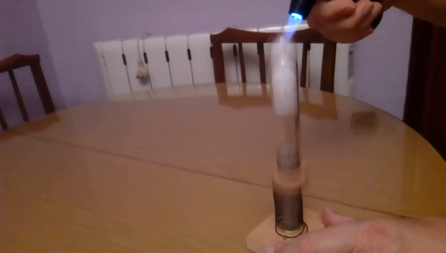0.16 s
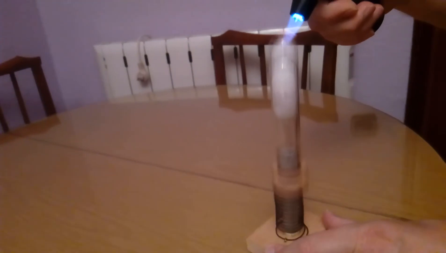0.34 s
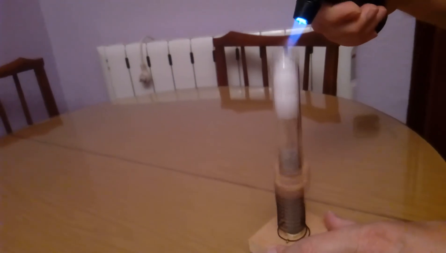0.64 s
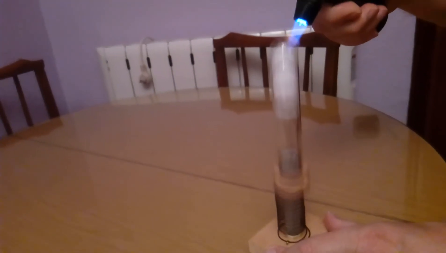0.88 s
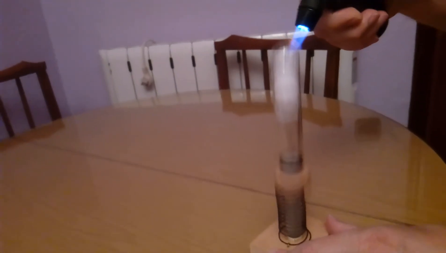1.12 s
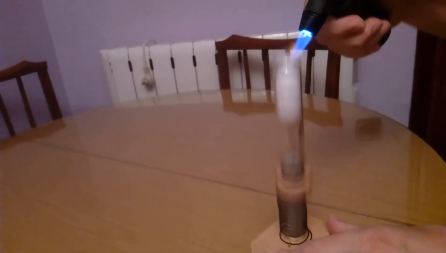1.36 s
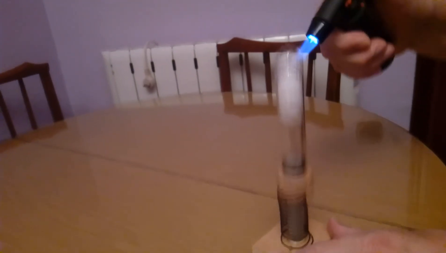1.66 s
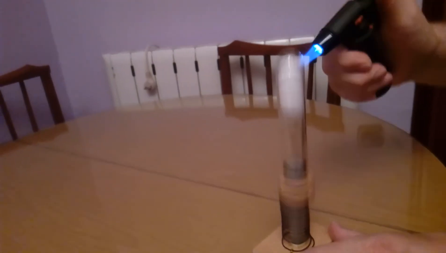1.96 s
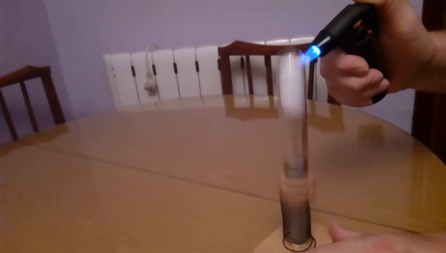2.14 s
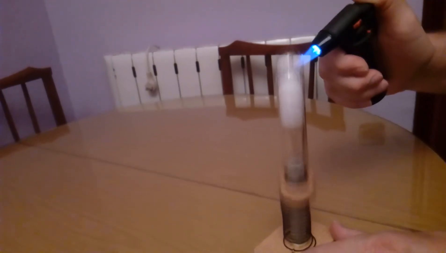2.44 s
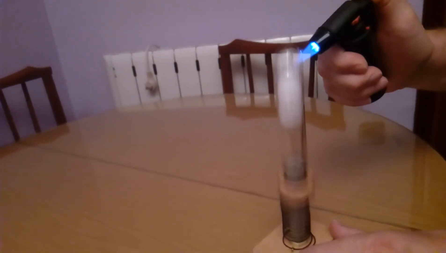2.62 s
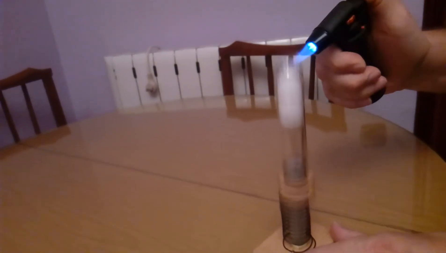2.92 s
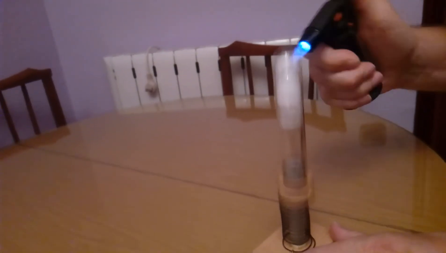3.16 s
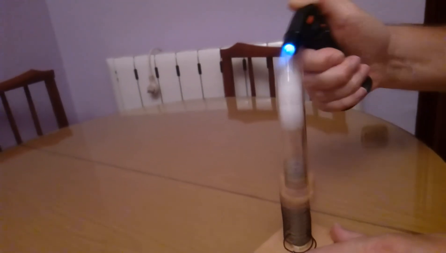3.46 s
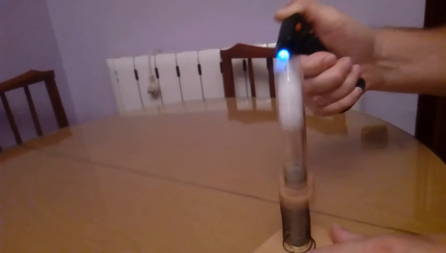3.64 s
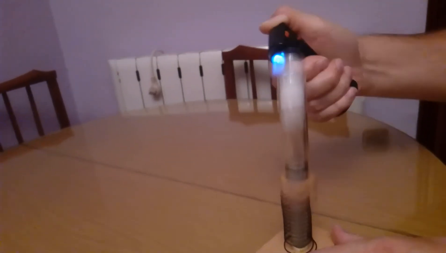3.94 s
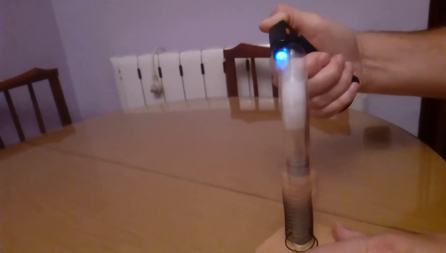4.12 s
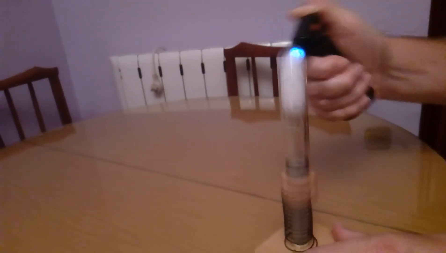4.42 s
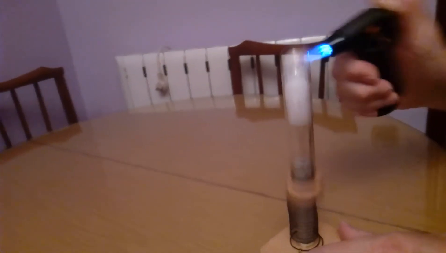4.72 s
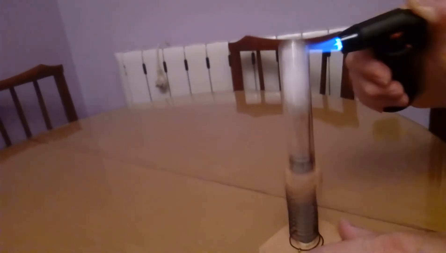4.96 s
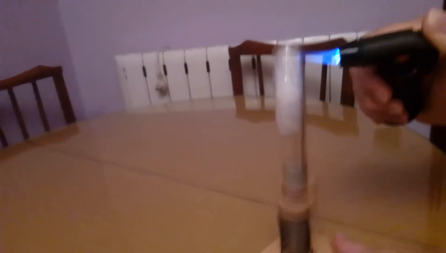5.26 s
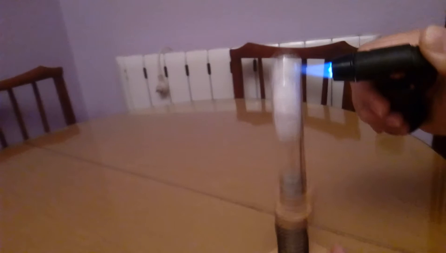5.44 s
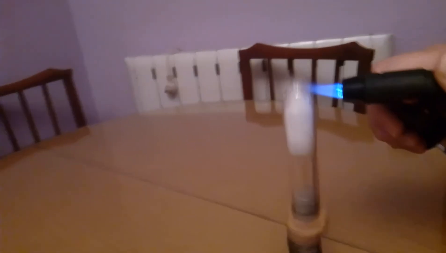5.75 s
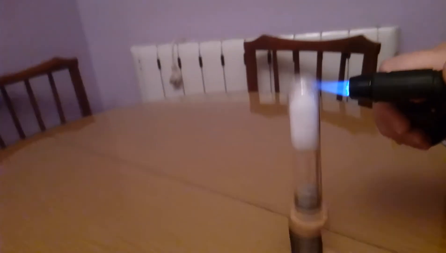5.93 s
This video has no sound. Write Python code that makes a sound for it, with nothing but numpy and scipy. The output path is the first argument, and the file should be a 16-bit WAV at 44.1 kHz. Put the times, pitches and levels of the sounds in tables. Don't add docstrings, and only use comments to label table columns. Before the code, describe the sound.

From 0 to about 6.1 seconds a small glass heat engine runs without pause on a wooden table, very near a phone microphone. Its piston knocks about eleven times a second, a fast, dry, hard clatter. Strokes vary: some land square, loud and full with a minute bounce, others glance off, thinner or duller. Roughly 35 to 40 milliseconds after each knock comes a quieter, looser rattle, then faint or clear taps on the tube wall. Glass scrapes on glass throughout. Strong accents stand out near 0.9, 1.75, 3.3 and 4.0 seconds; after about 5.2 the strokes are mostly glancing and weaker. A thin, fluttering gas hiss stays faint, dips near 4.5, swells slightly around 4.9, then fades gradually. A very low house hum lies below. Short reflections from table and wall and a brief dull room tail surround the blows.

```python
import sys
import numpy as np
from scipy import signal
from scipy.fft import rfft, irfft
from scipy.io import wavfile
from scipy.ndimage import uniform_filter1d

SR = 44100
rng = np.random.default_rng(int(sys.argv[2]) if len(sys.argv) > 2 else 0)


def magnitude_from_level(level_db):
    exponent = np.asarray(level_db, float) / 20
    return 10 ** exponent


def generate_wav(signal):
    frames = np.transpose(np.atleast_2d(signal))
    scaled = np.clip(frames, -1, 1) * 32767
    pcm = np.round(scaled).astype(np.int16)
    wavfile.write(sys.argv[1], SR, pcm)


N = 269010


def level(x, db):
    return x * magnitude_from_level(db) / np.sqrt(np.mean(x ** 2))


def band(x, hz, width_hz):
    return signal.lfilter(*signal.iirpeak(hz, hz / width_hz, fs=SR), x)


def lowpass(x, order, hz):
    return signal.sosfilt(signal.butter(order, hz, fs=SR, output="sos"), x)


def strikes(s, size):
    at = np.clip(np.round(np.ravel(s) * SR).astype(int), 0, N - 1)
    return np.bincount(at, np.ravel(size), N) + 1e-18


def ring(x, hz, t60_s, turn_rad):
    r = np.exp(-np.log(1000) / (t60_s * SR))
    w = 2 * np.pi * hz / SR
    return signal.lfilter([np.sin(turn_rad), r * np.sin(w - turn_rad)], [1, -2 * r * np.cos(w), r * r], x)


def walk(rate_hz):
    k = int(SR / rate_hz)
    held = np.repeat(rng.standard_normal(N // k + 1), k)
    return 1.8 * uniform_filter1d(uniform_filter1d(held, k), k)[:N]


# (time [s], level [dB], return stroke after [ms], upper body [dB], bounce gap [ms])
SQUARE_LANDINGS = [(0.1116, -12, 39, 1.4, 0.52), (0.2935, -12, 38.3, -6.5, 0.42),
                   (.567, -10, 42, -2.5, 0.49), (.7518, -11.5, 37.6, -7, 0.36),
                   (0.9343, -8, 38, -5.5, 0.48), (1.477, -13, 39, -2, 0.52), (1.752, -7.5, 43, -12, 0.46),
                   (1.8438, -11.5, 39, -4, .47), (1.939, -10.5, 29.4, -7.5, 0.49),
                   (2.0274, -11, 34, -2.5, 0.53), (2.1166, -12.5, 39.3, 0.5, 0.55),
                   (2.4828, -9.5, 34, -3, 0.46), (2.5735, -12, 38, -5, 0.54), (2.851, -10, 35, -14, 0.46),
                   (2.945, -16, 29.5, 0.5, 0.54), (3.3034, -9.5, 40.3, -13, 0.46),
                   (3.4851, -10.5, 38.1, 0, .51), (3.5794, -9.5, 34, -2.5, 0.48),
                   (4.0324, -9, 40, -2.5, .47), (4.306, -11, 39, -9.5, 0.4),
                   (4.4917, -10.5, 39.5, -6, 0.52), (4.6756, -11, 34, -1, 0.51),
                   (4.8565, -10.5, 42, -5, 0.44), (5.2208, -11.5, 41, -5.5, .545)]
# (time [s], level [dB], return stroke after [ms], glass edge [dB])
RIM_LANDINGS = [(.384, -18, 40.3, -11), (.4763, -17, 35.7, -5.5), (.66, -15, 34, -11),
                (.845, -17.5, 33.1, -12), (1.1162, -16, 39, -8), (1.2071, -15.5, 33.5, -11.5),
                (1.2957, -15, 38, -10), (1.3885, -15.5, 35.3, -11), (1.6625, -14.5, 33.5, -19),
                (2.663, -19.5, 38.6, -4), (2.758, -16, 37, -7), (3.0318, -18, 33.5, -8),
                (3.1227, -17.5, 36.5, -9), (3.3935, -17.5, 40, -10), (3.853, -16.5, 35, -8),
                (3.9417, -17.5, 40.6, -8), (4.1247, -15, 42, -9), (4.217, -16, 39.4, -6),
                (4.3982, -16, 39.5, -18), (4.5833, -16.5, 38.4, -10), (4.768, -18, 34, -10),
                (5.0381, -16, 40, -7), (5.1298, -15.5, 44.7, -8), (5.3106, -16.5, 40.5, -3),
                (5.9603, -19, 32.6, -20)]
# (time [s], level [dB], return stroke after [ms], glass edge [dB])
BASE_LANDINGS = [(.0225, -21, 34.2, -11), (0.2029, -18, 38, -13), (1.0269, -18.5, 31.7, -2),
                 (1.5693, -13, 38, -42), (2.2083, -17.5, 39, -20), (2.3035, -17.5, 32, -33),
                 (2.3918, -19, 33.4, -31), (3.2138, -19, 36.8, -15), (3.6696, -19, 36, -4.5),
                 (3.7614, -25.5, 35.6, -4), (4.9464, -18.5, 39.7, -6.5), (5.403, -17, 41, -2),
                 (5.4962, -20.5, 38.5, -17), (5.5909, -20.5, 32.6, 3.5), (5.6815, -16.5, 40, -1),
                 (5.778, -20.5, 30.5, 3), (5.8697, -22, 30.4, -5.5), (6.0531, -20.5, 32, -25)]
SQUARE_LOW_DB, LOW_PER_UPPER = -4, 1.85
SQUARE_EDGE_DB, EDGE_PER_UPPER = -14, 1.6
RIM_LOW_DB, BASE_LOW_DB = -8, -6
GLANCING_UPPER_DB, UPPER_PER_EDGE = 1.75, 0.26


def knocks():
    s, db, _, upper_db, gap_ms = np.transpose(SQUARE_LANDINGS)
    low_db = SQUARE_LOW_DB + LOW_PER_UPPER * upper_db
    edge_db = SQUARE_EDGE_DB + EDGE_PER_UPPER * upper_db
    rows = [(s, db, low_db, upper_db, edge_db, gap_ms)]
    for table, low_db in ((RIM_LANDINGS, RIM_LOW_DB), (BASE_LANDINGS, BASE_LOW_DB)):
        s, db, _, edge_db = np.transpose(table)
        upper_db = GLANCING_UPPER_DB + UPPER_PER_EDGE * edge_db
        rows.append((s, db, low_db + 0 * s, upper_db, edge_db, 0 * s))
    return np.hstack(rows)


# (time [s], level [dB], tube ring [dB])
WALL_TAPS = [(0.3395, -30, 2), (0.881, -26, 7), (1.0662, -23.5, 6), (1.247, -22, 10), (1.3357, -28, -1),
             (1.427, -20.5, 6), (1.6089, -24, -7), (1.6994, -29, 11.5), (2.0671, -22, 6),
             (2.6185, -28.5, 4), (3.0699, -22, 2), (3.162, -22, 7), (3.3483, -33, -1), (3.44, -24.5, 3),
             (3.6204, -22.5, 2), (3.709, -26.5, 10), (3.7162, -32, 11), (3.8018, -26, 0), (3.8937, -26, 5),
             (4.079, -29, 3), (4.2613, -26, 10), (4.717, -30, 9), (4.8094, -29, 16.5), (4.9012, -29, 10),
             (4.9912, -25.5, 0), (5.0843, -25, 1.4), (5.2664, -21.5, -9), (5.449, -20, -5),
             (5.6273, -25.5, 5), (5.815, -27, 3)]
RETURN_DB, RETURN_DB_PER_MS, USUAL_RETURN_MS = -19, 0.41, 37
RETURN_UPPER_DB, UPPER_SCATTER_DB = -6, 3
RETURN_TUBE_DB, TUBE_SCATTER_DB = -11, 2
TAP_UPPER_DB = -2.5
FAINT_TAP_DB, FAINT_TAP_TUBE_DB, FAINT_TAP_AFTER_MS = -36, 10, 5.5


def rattles():
    landings = [*SQUARE_LANDINGS, *RIM_LANDINGS, *BASE_LANDINGS]
    s, _, after_ms = np.transpose([row[:3] for row in landings])
    upper, tube, wait_ms, faint = rng.standard_normal((len(s), 4)).T
    back_s = s + after_ms / 1000
    back_db = RETURN_DB + RETURN_DB_PER_MS * (after_ms - USUAL_RETURN_MS)
    back = (back_s, back_db, RETURN_UPPER_DB + UPPER_SCATTER_DB * upper, RETURN_TUBE_DB + TUBE_SCATTER_DB * tube)
    faint_s = back_s + (FAINT_TAP_AFTER_MS + wait_ms) / 1000
    faint_taps = (faint_s, FAINT_TAP_DB + 0 * s, TAP_UPPER_DB + 0 * s, FAINT_TAP_TUBE_DB + 2 * faint)
    tap_s, tap_db, tap_tube_db = np.transpose(WALL_TAPS)
    loud_taps = (tap_s, tap_db, TAP_UPPER_DB + 0 * tap_s, tap_tube_db)
    return np.hstack([back, faint_taps, loud_taps])


# (frequency [Hz], t60 [s], knock [dB], rattle [dB], left lag [rad], left excess [dB])
BODY_MODES = [(620, 0.0069, -3, -4, -0.45, -9), (1210, 0.0063, -6.5, -6, 0.37, -6),
              (1730, 0.0045, -6, -5.5, 1.3, 1.5), (2266, 0.0052, 1, -3.5, 1.0, 0),
              (3070, 0.0036, -2.5, -9.5, 2, -8), (3606, 0.0018, 2.5, -8.5, 0.77, 8),
              (4920, 0.0019, -6.5, 1.5, 1.28, 2), (5890, 0.032, -23.5, -12.5, 2.5, 4),
              (6800, 0.0023, -12.5, -11, 22, -12), (9900, 0.0043, 0, -7, 3, 3),
              (12700, 0.0021, -38, -1.5, 40.5, 1)]
CHATTER_S, CHATTER_DB, CHATTER_SCATTER_DB = .005, -17, 3
SKID_S, GRAZE_S, GRAZE_DB, BOUNCE_DB = .0006, .00054, 6, -.8
SQUARE_PAN_DB, GLANCING_PAN_DB, LOOSE_PAN_DB = -0.3, -3, 1.5
THIN_HZ, LEAK_DB = 840, -30.5
CONTACT_HZ, LOOSE_HZ = 9500, 7800
LOW_TOP_HZ, MIDDLE_TOP_HZ, UPPER_TOP_HZ = 1400, 2900, 6500


def engine(knock_rows, rattle_rows):
    s, db, low_db, upper_db, edge_db, gap_ms = knock_rows
    r_s, r_db, r_upper_db, tube_db = rattle_rows
    square = gap_ms > 0
    pan_db = np.where(square, SQUARE_PAN_DB, GLANCING_PAN_DB)
    late_s = CHATTER_S * rng.exponential(size=(len(r_s), 8))
    tick = magnitude_from_level(CHATTER_DB + CHATTER_SCATTER_DB * rng.standard_normal(late_s.shape))
    tick = tick * rng.choice([-1, 1], late_s.shape)
    skid_s = SKID_S * (np.arange(3) + rng.random(size=(len(r_s), 3)) - 1)
    touch = magnitude_from_level(2.0 * rng.standard_normal(skid_s.shape) - 4.5)
    touch = touch * np.sign(rng.standard_normal(skid_s.shape))
    out = np.zeros((2, N))
    for hz, t60_s, knock_db, rattle_db, lag_rad, left_db in BODY_MODES:
        regions = [hz < LOW_TOP_HZ, hz < MIDDLE_TOP_HZ, hz < UPPER_TOP_HZ]
        colour_db = np.select(regions, [low_db, 0 * db, upper_db], edge_db)
        size = np.where(square, .55, -1) * magnitude_from_level(db + colour_db + knock_db + 7)
        r_regions = [hz < MIDDLE_TOP_HZ, 5500 < hz < UPPER_TOP_HZ]
        r_colour_db = np.select(r_regions, [0 * r_db, tube_db], r_upper_db)
        spot_db = 1.5 * rng.standard_normal(len(r_s))
        r_size = magnitude_from_level(r_db + r_colour_db + rattle_db + 4 + spot_db)[:, None]
        loose = strikes(r_s[:, None] + skid_s, r_size * touch) + strikes(r_s[:, None] + late_s, r_size * tick)
        loose = signal.lfilter(*signal.butter(2, LOOSE_HZ, fs=SR), loose)
        for side, sign in enumerate((1, -1)):
            heard = size * magnitude_from_level(sign * pan_db / 2)
            bounce = strikes(s + gap_ms / 1000, heard * square * magnitude_from_level(BOUNCE_DB) * (hz > LOW_TOP_HZ))
            graze = strikes(s - GRAZE_S, heard * square * magnitude_from_level(GRAZE_DB) * (hz < 2000))
            blows = strikes(s, heard) + bounce - graze + magnitude_from_level(sign * LOOSE_PAN_DB / 2) * loose
            out[side] += magnitude_from_level(sign * left_db / 2) * ring(blows, hz, t60_s, -.5 * sign * lag_rad)
    thin = signal.sosfilt(signal.butter(4, THIN_HZ, "high", fs=SR, output="sos"), out)
    return lowpass(thin + magnitude_from_level(LEAK_DB) * out, 2, CONTACT_HZ)


# (frequency [Hz], density [dB per Hz])
SCRAPE_COLOUR = [(88, -45), (150, -12.5), (301, -8.5), (1130, 0), (2140, -6), (2770, -3), (4380, -11.5),
                 (5870, -8.5), (8170, -22), (9990, -27), (12000, -44), (15600, -68), (22000, -120)]
SLIDE_DB, SLIDE_FADE_S, SLIDE_REST = -38.5, 0.0081, 0.64


def slide(s):
    fade = np.exp(-1 / (SLIDE_FADE_S * SR))
    push = SLIDE_REST + signal.lfilter([1], [1, -fade], strikes(s, .5 + 0 * s))
    hz = np.fft.rfftfreq(N, 1 / SR) + 1
    colour_hz, colour_db = np.transpose(SCRAPE_COLOUR)
    colour = magnitude_from_level(np.interp(np.log(hz), np.log(colour_hz), colour_db))
    grain = rng.standard_normal((2, N)) * magnitude_from_level(2 * walk(200))
    mid, side = rfft(grain) * colour
    side = side * np.clip(hz / 4500, 0, 1) ** 0.47
    return level(irfft([mid + side, mid - side], N) * push, SLIDE_DB)


# (time [s], hiss [dB])
TORCH_LEVEL = [
    (0.0, -57.5),
    (4.55, -59),
    (4.91, -56),
    (6.1, -62.5),
]
FLAME_HZ, FLAME_WIDTH_HZ = 13800, 4500


def flame():
    s, db = np.transpose(TORCH_LEVEL)
    hiss = rng.standard_normal((2, N))
    for _ in range(2):
        hiss = band(hiss, FLAME_HZ, FLAME_WIDTH_HZ)
    flutter_db = 2 * walk(60)
    return level(hiss, 1.5) * magnitude_from_level(np.interp(np.arange(N) / SR, s, db) + flutter_db)


# (frequency [Hz], width [Hz], level [dB])
HOUSE_TONES = [(30, 30, -81), (76, 81, -77.5), (130.6, 13, -65), (160.4, 25, -69), (202.6, 12, -61.5),
               (248, 17, -64), (374, 60, -60.5)]


def hum():
    out = 0
    for hz, width_hz, db in HOUSE_TONES:
        mid, side = band(band(rng.standard_normal((2, N)), hz, width_hz), hz, width_hz)
        out = out + level(mid + (0.14 + 14 / hz) * side * np.array([[1], [-1]]), db)
    return out


# (delay [s], left [dB], right [dB])
EARLY_ECHOES = [(.0015, -20.5, -38), (.0028, -9.5, -15.5), (.0060, -25.5, -14), (.0083, -29, -41),
                (0.0127, -18, -29)]
ROOM_T60_S, ROOM_DULL_HZ, ROOM_DB, ECHO_SMEAR_S = 0.28, 7200, -10, 0.00061


def room(near):
    t = np.arange(SR // 3) / SR
    tail = magnitude_from_level(ROOM_DB - 29.5 - 60 * t / ROOM_T60_S) * np.clip(t / 0.0013, 0, 1)
    shape = tail + np.zeros((2, 1))
    for s, left_db, right_db in EARLY_ECHOES:
        smear = np.exp(-((t - s) / ECHO_SMEAR_S) ** 2)
        shape = shape + magnitude_from_level([[left_db - 15.5], [right_db - 24.5]]) * smear
    answer = lowpass(shape * rng.standard_normal(shape.shape), 1, ROOM_DULL_HZ)
    return signal.fftconvolve(near, answer, axes=1)[:, :N]


TOP_HZ = 15600


def scene():
    blows, loose = knocks(), rattles()
    near = engine(blows, loose)
    steady = lowpass(slide(np.r_[blows[0], loose[0]]) + flame() + hum(), 12, TOP_HZ)
    return near + room(near) + steady


def low_pass(x):
    return signal.sosfilt(signal.butter(12, 16520, fs=SR, output="sos"), x)


# (frequency [Hz], width [Hz], left [dB], right [dB])
PORT_MODES = [(5830, 290, 3, 1.5), (9870, 980, -3.5, 5.5)]


def record(dry):
    x = dry
    for hz, width_hz, left_db, right_db in PORT_MODES:
        x = x + magnitude_from_level([[left_db], [right_db]]) * band(dry, hz, width_hz)
    x = lowpass(np.clip(x, -.92, .92), 6, TOP_HZ)
    return low_pass(x)


dry = scene()
out = record(dry)
generate_wav(out)
```